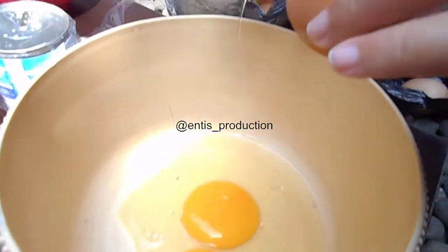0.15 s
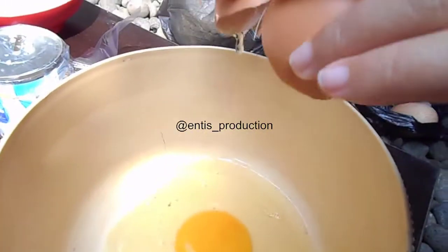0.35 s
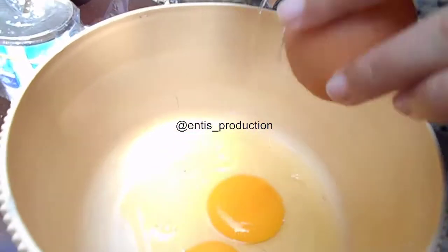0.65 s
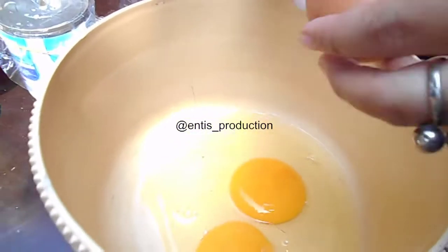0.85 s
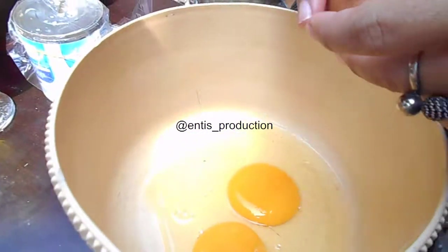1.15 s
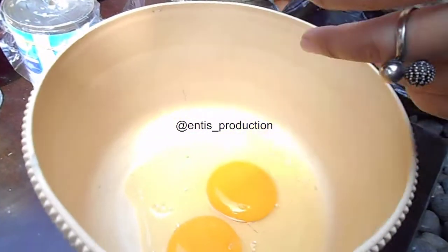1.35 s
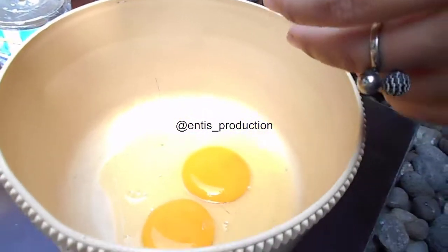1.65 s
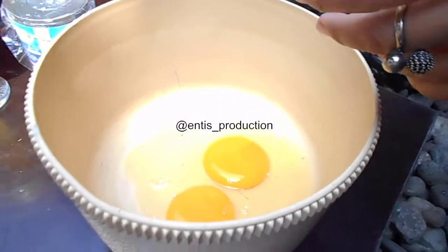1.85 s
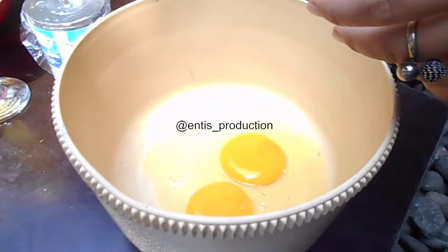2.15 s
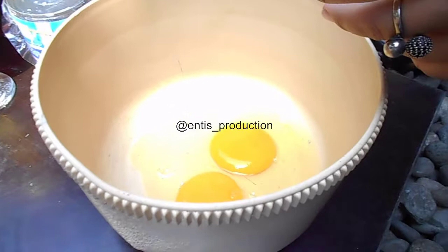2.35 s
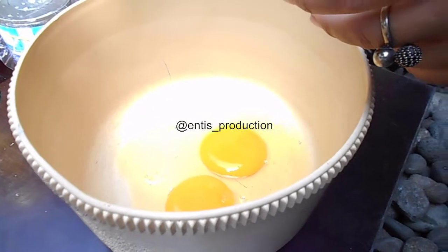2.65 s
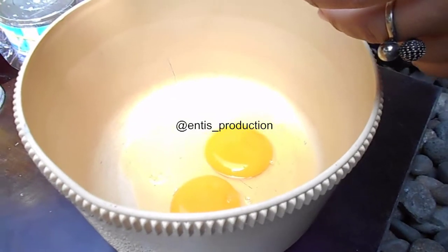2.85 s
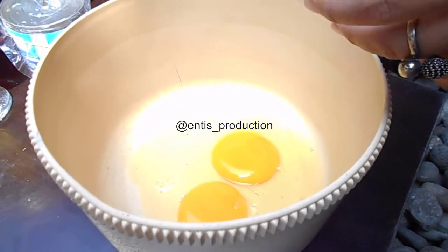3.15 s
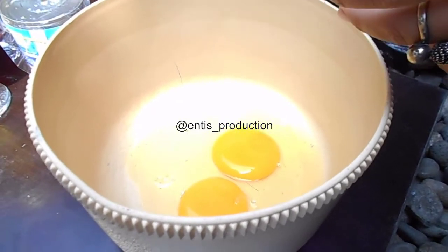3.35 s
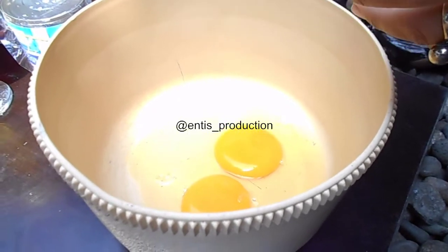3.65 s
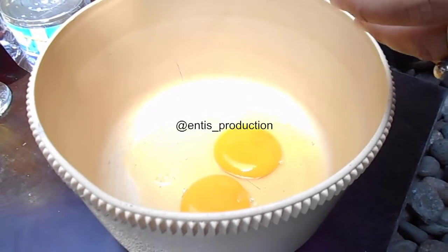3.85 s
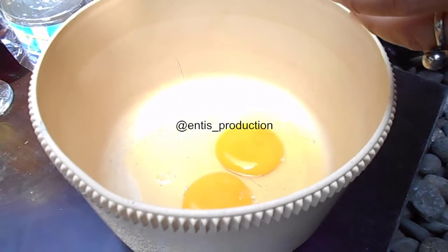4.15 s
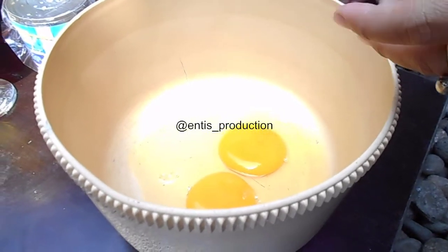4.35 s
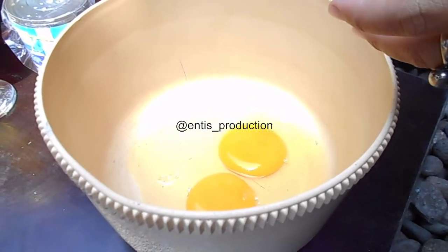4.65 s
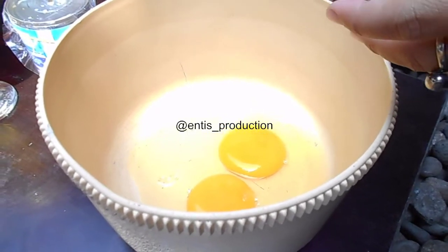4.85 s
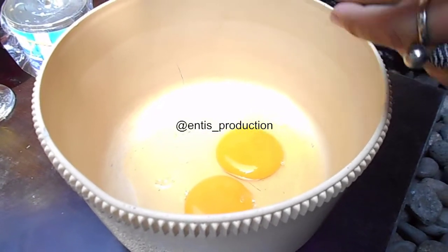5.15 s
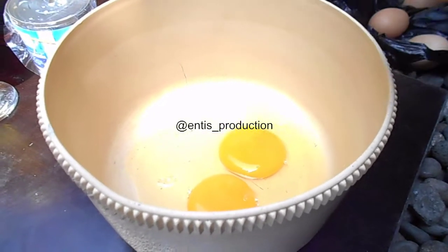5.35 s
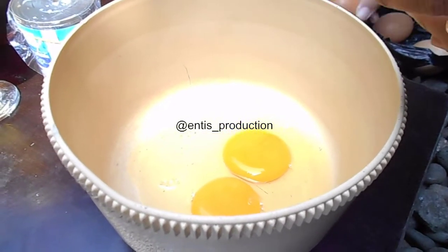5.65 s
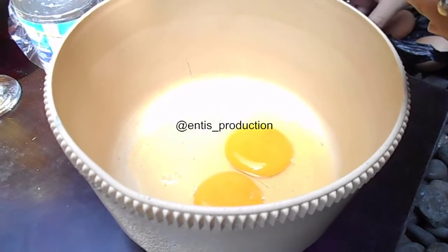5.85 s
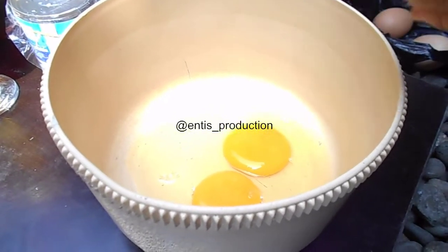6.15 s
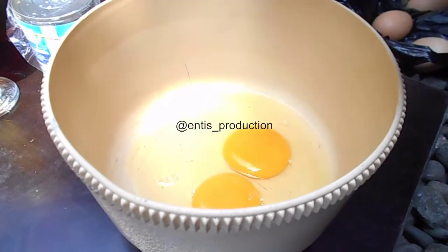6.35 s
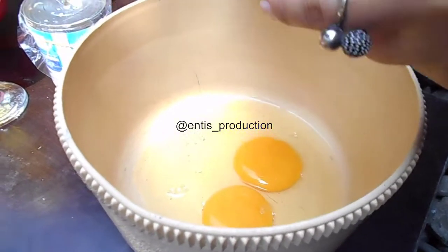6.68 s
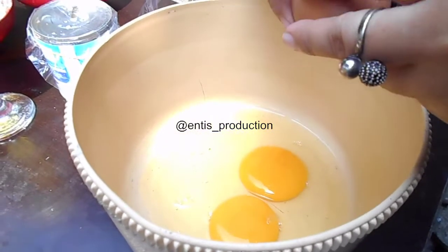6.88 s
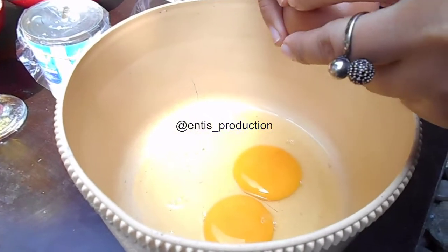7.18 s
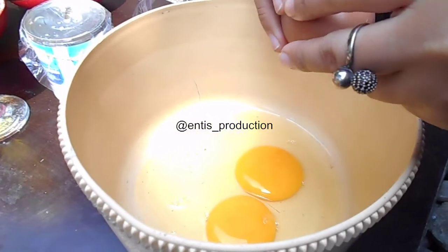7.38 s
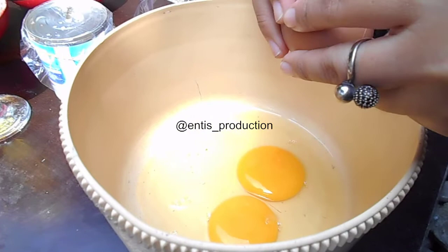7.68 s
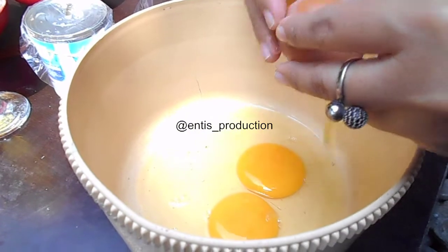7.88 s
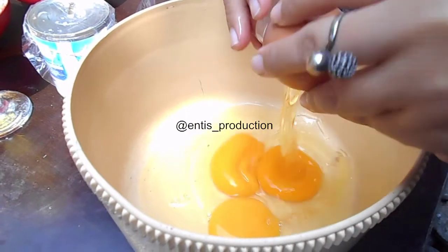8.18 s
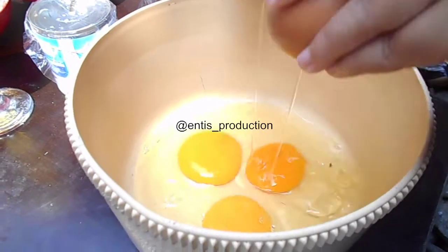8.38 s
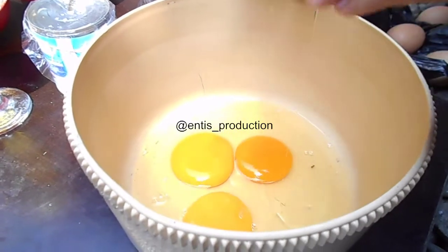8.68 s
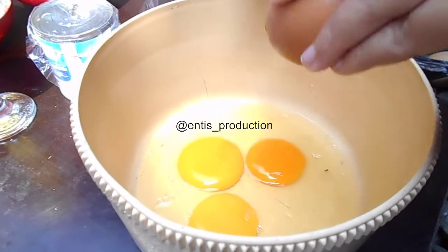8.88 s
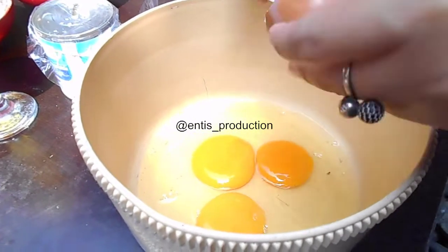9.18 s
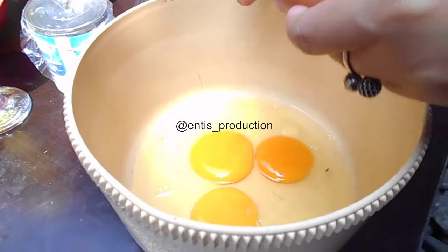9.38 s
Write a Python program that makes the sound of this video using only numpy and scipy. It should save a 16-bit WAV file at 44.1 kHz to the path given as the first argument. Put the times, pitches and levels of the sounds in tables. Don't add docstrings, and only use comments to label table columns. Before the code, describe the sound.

Steady soft hiss with a faint wandering traffic rumble, outdoors-like with a short diffuse tail; the hands are very close. Around 0.06 and 0.3 s empty eggshells snap brightly, again at 0.9, then halves rattle lightly to about 1.2 s, while thin bird whistles chirp far off. From 1.3, and strongest from 1.6 to 4.2 s, a thin bag crackles in uneven grips, tugs and pops, with sharp eggy clicks near 2.4 and 2.5. Hollow tub knocks with cracks land at 4.36, 4.6 and 4.8, a lighter one at 5.8, among dry ticks. A faint high insect trills in spells. Birds return around 6.7 to 7.4. At 7.7 a dense, overloaded crunch caves the shell in; small splits and a pop follow at 8.1 to 8.25. Mostly hiss and traffic drone remain until shell snaps at 9.0 and 9.3 and a hard crackling cluster at 9.45.

```python
import sys
import numpy as np
from scipy import signal
from scipy.io import wavfile

SR = 44100
rng = np.random.default_rng(int(sys.argv[2]) if len(sys.argv) > 2 else 0)


def wrap_up_sound(samples):
    columns = np.atleast_2d(samples).T
    tamed = np.clip(columns, -1, 1)
    steps = np.round(tamed * 32767).astype(np.int16)
    wavfile.write(sys.argv[1], SR, steps)


def magnitude_from_level(level_db):
    exponent = np.asarray(level_db, float) / 20
    return 10 ** exponent


N = 419743
T = np.arange(N) / SR


def rms_one(x):
    return x / np.sqrt(np.mean(x ** 2) + 1e-20)


def peak_one(x):
    return x / np.max(np.abs(x))


def add(out, s, piece):
    i = round(s * SR)
    out[i:i + len(piece)] += piece[:N - i]


def fading(t60, size):
    return magnitude_from_level(-60 * np.arange(size) / SR / t60)


def passed(x, hz, kind, order=2):
    return signal.sosfilt(signal.butter(order, hz, kind, fs=SR, output="sos"), x)


def resonance(x, hz, width_hz):
    r = np.exp(-np.pi * width_hz / SR)
    return signal.lfilter([1 - r * r, 0, r * r - 1], [1, -2 * r * np.cos(2 * np.pi * hz / SR), r * r], x)


def drift(rate_hz, spread_db):
    step = 100
    r = np.exp(-2 * np.pi * rate_hz * step / SR)
    coarse = rng.standard_normal(N // step + 1002)
    slow = signal.lfilter([1], [1, -2 * r, r * r], coarse)[1000:]
    return np.interp(np.arange(N) / step, np.arange(len(slow)), magnitude_from_level(spread_db * rms_one(slow)))


def coloured(source, spectrum, patchy_db, patch_hz, first):
    out = 0
    edges = 25 * 2 ** np.arange(0, 9, .4)[first:]
    hz, level_db = np.transpose(spectrum)
    for k, (low, high) in enumerate(zip(edges, edges[1:])):
        band_db = np.interp(np.log(low * high) / 2, np.log(hz), level_db)
        sign = (-1) ** k
        out = out + sign * magnitude_from_level(band_db) * drift(patch_hz, patchy_db) * passed(source, [low, high], "band")
    return rms_one(out)


def grains(per_s, spread_db, size):
    strengths = magnitude_from_level(spread_db * np.minimum(rng.exponential(1, size), 4))
    return strengths * rng.choice([-1, 1], size) * (rng.random(size) < per_s / SR)


def held(start, end, rise_db, fall_db):
    return -rise_db * np.maximum(start - T, 0) - fall_db * np.maximum(T - end, 0)


def walls(x, t60):
    echo = passed(rng.standard_normal(14000), 580, "high") * fading(t60, 14000)
    return signal.fftconvolve(x, echo / np.sqrt(np.sum(echo ** 2)))[:N]


def air():
    # frequency in Hz, level in dB per Hz.
    air_spectrum = [(15, -43), (25, -6.5), (133, -3.5), (171, -5.5), (204, -7.5), (346, -8), (797, -12),
                    (905, -12), (1840, -15), (5440, -19), (6020, -22), (9020, -21.5), (10500, -17.5),
                    (13600, -55), (22000, -120)]
    # time in seconds, level in dB.
    breeze = [(0, -46.5), (4.3, -46.5), (5.6, -49), (7.2, -47), (7.9, -51), (9.52, -47.5)]
    breeze_db = np.interp(T, *np.transpose(breeze))
    rumble_db = -46.5 + 2.5 * np.exp(-(T - 7.7) ** 2)
    noise = coloured(rng.standard_normal(N), air_spectrum, 1.92, 6.3, first=0)
    hiss = rms_one(passed(noise, 420, "high", order=4))
    rumble = rms_one(passed(noise, 311, "low", order=4))
    return magnitude_from_level(breeze_db + 5.5) * hiss + magnitude_from_level(rumble_db) * rumble


def birds():
    # start in seconds, length in seconds, pitch in Hz, blur width in Hz, level in dB.
    squeaks = [(.0, 0.08, 4430, 400, -43), (0.975, 0.25, 4830, 500, -39), (1.3, 0.091, 4900, 400, -41),
               (6.699, 0.15, 4820, 700, -42), (6.916, .087, 5300, 500, -48),
               (7.204, 0.098, 4600, 350, -38.5), (7.205, 0.18, 6800, 450, -46),
               (7.391, 0.15, 6030, 695, -44), (6.758, 0.18, 2400, 600, -48), (7.058, 0.13, 4400, 500, -48),
               (7.19, 0.09, 5600, 250, -47), (8.475, 0.11, 5550, 400, -47), (8.501, .03, 3700, 300, -45),
               (4.05, .14, 3760, 500, -34.5), (7.296, .14, 4460, 500, -52)]
    # start in seconds, length in seconds, first Hz, last Hz, level in dB.
    whistles = [(0.111, 0.17, 3050, 3020, -44), (0.152, 0.075, 4700, 4750, -38),
                (.153, 0.12, 6800, 6900, -41.5), (0.19, 0.11, 3850, 3780, -38),
                (0.331, 0.15, 4300, 4170, -44), (.86, 0.038, 4260, 4450, -45),
                (0.898, 0.048, 4440, 4450, -30), (0.952, 0.048, 4470, 4200, -35),
                (0.933, 0.091, 3600, 3600, -37.5), (0.997, 0.046, 4160, 4120, -34),
                (1.02, 0.073, 3600, 3600, -37), (1.042, 0.064, 4060, 4250, -37),
                (1.09, 0.037, 4070, 3900, -38), (1.103, 0.12, 3540, 3580, -36.5),
                (1.41, 0.069, 4250, 4350, -40), (1.47, 0.15, 4400, 4350, -50),
                (.915, 0.031, 6500, 6440, -38), (1.54, .07, 8250, 8300, -51), (3.16, 0.16, 4260, 4200, -41),
                (4.199, 0.14, 3720, 3800, -36.5), (4.243, 0.085, 4730, 4760, -37),
                (6.7, 0.079, 3900, 3880, -51), (6.7, 0.11, 6150, 6100, -50),
                (6.801, 0.15, 3750, 3840, -39.5), (7.043, 0.09, 4130, 4420, -46),
                (7.108, 0.098, 4000, 4090, -41), (7.142, 0.076, 4250, 4250, -36.5),
                (7.241, .14, 4370, 4500, -43.5), (7.22, 0.23, 6640, 6450, -47)]
    rise_hz, sag_hz_per_s = 250, 2700
    blur_hz, steadiness = 210, .55
    far = [(s, length, hz, rise_hz - sag_hz_per_s * length, db, width_hz, 0)
           for s, length, hz, width_hz, db in squeaks]
    near = [(s, length, (first + last) / 2, last - first, db, blur_hz, steadiness)
            for s, length, first, last, db in whistles]
    out = np.zeros(N)
    for s, length, hz, glide_hz, db, width_hz, steady in far + near:
        size = round(length * SR)
        phase = 2 * np.pi * np.cumsum(hz + glide_hz * np.linspace(-.5, .5, size)) / SR
        blur = rms_one(passed(rng.standard_normal((2, 12000)), width_hz / 2, "low"))[:, -size:]
        note = (steady + blur[0]) * np.cos(phase) + blur[1] * np.sin(phase)
        swell = np.sin(np.pi * np.linspace(0, 1, size) ** 0.57)
        add(out, s, magnitude_from_level(db) * rms_one(note) * swell)
    return out


def engines():
    # start in seconds, length in seconds, first Hz, last Hz, level in dB.
    drones = [(0, 1.34, 97, 91.2, -50), (1.15, 0.69, 133, 136.7, -48.5), (.8, 0.6, 152, 154, -58),
              (5.9, 0.98, 125, 129.5, -52), (6, 1.5, 147, 148.6, -53), (6.7, 3.7, 84, 88.5, -55),
              (7.6, 1, 42, 45, -61), (7.6, 0.82, 188, 192.4, -46.5), (7.8, 1.28, 133, 127.2, -53),
              (8.65, 0.3, 200, 202, -48), (8.95, 0.34, 156, 156, -45), (8.2, 1.3, 170, 160, -56)]
    out = np.zeros(N)
    for s, length, first_hz, last_hz, db in drones:
        size = round(length * SR)
        turns = np.cumsum(np.linspace(first_hz, last_hz, size) * drift(2.5, .08)[:size]) / SR
        swell = np.sin(np.pi * np.linspace(0, 1, size)) ** .6
        add(out, s, magnitude_from_level(db) * drift(4, 2.5)[:size] * np.sin(2 * np.pi * turns) * swell)
    return out


def fracture(bright_db, ring_db, hz, t60, squeezed=False):
    # ratio to its pitch, level in dB.
    piece_modes = [(0.985, 6), (1.346, -5.5), (1.618, -7), (0.82, -1.5)]
    size = 2200
    rise_s = 0.0018 if squeezed else 0.0012
    rise = np.minimum(np.arange(size) / (rise_s * SR), 1)
    spray = (rng.standard_normal(size) + .5 * grains(4000, 6.7, size)) * rise * fading(t60, size)
    centre_hz, width_hz, spread = (9800, 2700, .06) if squeezed else (7860, 3700, .26)
    own_hz = centre_hz * (1 + spread * rng.uniform(-1.35, 1))
    bright = passed(resonance(spray, own_hz, width_hz), 4500, "high")
    bent = resonance(spray * fading(11 * t60, size), 1.11 * hz, 0.51 * hz)
    ring = sum(magnitude_from_level(db) * resonance(bent, hz * ratio, 0.085 * hz) for ratio, db in piece_modes)
    thump = resonance(spray, 260, 720)
    thump_db = 3.2 * bright_db - 35.4
    return magnitude_from_level(bright_db) * peak_one(bright) + magnitude_from_level(ring_db - 4) * peak_one(ring) + magnitude_from_level(thump_db) * peak_one(thump)


def snaps():
    # start in seconds, bright peak in dB, ring in dB, ring in Hz.
    squeezes = [(.056, -24, -12, 7300), (.0586, -23, -14.5, 2040), (.0605, -16, -13, 5430),
                (.063, -19, -4.5, 7430), (.0655, -9.5, -14.5, 3300), (.068, -25, -18, 5300),
                (.071, -30, -23, 2400), (.1858, -13.5, -21, 1740), (.3165, -11, -7, 5300),
                (.32, 1.5, -19, 5140), (.3225, -11, -8, 5100), (.314, -10, -20, 1770),
                (.351, -14, -18, 4900), (.362, -22, -23, 2770), (.366, -11, -20, 6500),
                (.371, -15, -16, 5300), (.376, -27, -28, 5330), (.3294, -5, -15, 2600),
                (.3373, 0.5, -16, 2230), (.3461, -0.5, -13, 3630), (.3563, -12, -20, 2780),
                (.8898, -1.5, -39, 6900), (.892, -20, -13, 7300), (.9489, -24, -23, 3640),
                (1.4076, -37, -19.5, 3200), (9.013, -30, -24, 2210), (9.0388, -3.5, -25, 5300),
                (9.3222, -17, -7.5, 1990), (9.337, -38, -20, 2120), (9.3525, -33, -17, 3200),
                (9.353, -40, -15, 2090), (9.3675, -38, -19, 3400), (9.4355, -20, -18, 6000),
                (.884, -40, -26.5, 2210), (9.4522, 5, -13, 2600), (9.457, -5, -7, 6000),
                (9.461, -2, -2, 2010), (9.4645, -9, -6, 2900), (9.468, -18, -22, 4300),
                (9.473, -32, -9, 2900), (9.485, -38, -23, 2900), (9.493, -32, -20, 2500),
                (9.502, -32, -28, 3000)]
    # start in seconds, bright peak in dB, ring in dB.
    drops = [(.961, -12.5, -10), (0.993, -17, -5.5), (.999, -6.5, -11), (1.002, -8.5, -16),
             (1.006, -12, -20), (1.0733, -16.5, -9.5), (1.0985, -31, -19), (1.126, -13, -11),
             (1.134, -17, -13), (1.142, -37, -22), (1.17, -23, -11.5), (9.435, -16, -13.5),
             (9.442, -34, -29), (9.453, -18, -15), (9.456, -14, -3.5), (9.4617, -1.5, -4.5),
             (9.467, -7, -6), (9.478, -31, -9)]
    # start in seconds, bright peak in dB, ring in dB, Hz.
    creases = [(1.6945, -13, -31, 4350), (2.3264, -22, -28, 5200), (2.3861, -0.5, -9.5, 1820),
               (2.388, -12, -9, 8100), (2.565, -30, -16.5, 1950), (2.92, -30, -13.5, 2900),
               (2.959, -30, -17, 2900), (2.98, -32, -18, 2900), (2.922, -20, -5, 8900),
               (2.387, -17, -11, 6400), (2.45, -11, -7, 6000), (2.476, -7, -15, 1860),
               (2.477, -25, -10, 5770), (2.5256, 6, -9, 1950), (2.5257, -19, -4, 5530),
               (2.6086, -28, -16, 2590), (2.8419, -17, -14.5, 1970), (2.9178, -16, -10.5, 1860),
               (2.9585, -11.5, -12, 1860), (3.02, -14, -18.5, 1930), (3.5646, -28, -29, 4480),
               (3.7062, -23, -12.5, 920), (3.7308, -23, -10, 910), (3.732, -30, -22, 520),
               (3.706, -30, -21, 620), (3.808, -27, -20, 1240), (4.193, -30, -32, 910),
               (3.765, -33, -21, 2100), (6.8294, -36, -32, 3820)]
    # start in seconds, bright peak in dB, ring in dB, ring in Hz.
    crunch = [(7.7099, 8.5, -11, 3670), (7.7145, -10, -15, 3520), (7.724, 9, 0.5, 3410),
              (7.7262, 2.5, 4, 3570), (7.7458, 7.5, 5.5, 3320), (7.748, -4, -7, 3440),
              (7.7075, -14, -30, 3500), (7.7205, -18, -3, 3570), (7.7745, 4.5, -8, 2900),
              (7.7595, 7, 2, 2900), (7.7615, 2, 7, 2980), (7.765, 9.5, 8, 3430), (7.768, 3, 12, 3000),
              (7.7716, 8, 6, 2860), (7.779, -19, -15, 3000)]
    # start in seconds, bright peak in dB, ring in dB, ring in Hz.
    cracks = [(4.388, -33, -10, 2780), (4.4665, -22.5, -70, 704), (4.615, -14, -16, 3320),
              (4.8192, -9, -6, 2970), (4.849, -20, -15, 1720), (5.8055, -24, -27, 4550),
              (5.8095, 2, -15, 3200), (5.8185, -5, -8, 3040), (5.866, -13, -13, 4470),
              (5.8662, -14, -16, 2900), (7.8502, -24, -15, 2190), (7.8682, -33, -16.5, 2190),
              (7.9807, -30, -25.5, 1970), (8.1435, -0.5, 0.5, 4490), (8.1437, -29, -7, 2320),
              (8.213, -26, -22, 4000), (8.2144, -10, -7.5, 5030), (8.216, -7, -10, 7000),
              (8.2252, -4.5, -0.5, 5010), (8.227, -18, 5, 1970), (8.2345, -24, -5, 1970),
              (8.243, -40, -23, 3450), (8.298, -31, -40, 4000), (8.315, -32, -23.5, 4000),
              (8.3825, -40, -18, 2500), (8.097, -30, -45, 5500), (8.525, -40, -30, 4000)]
    # start in seconds, peak in dB.
    ticks = [(0.054, -14), (0.1924, -11.5), (0.2441, -24), (0.506, -24), (0.811, -25), (2.762, -7),
             (4.1157, -12), (4.23, -15), (4.288, -17.5), (4.3273, -11), (4.578, -13), (4.754, -19.5),
             (4.8045, -21), (4.909, -21), (4.944, -22), (5.01, -24), (5.2651, -26.5), (5.292, -27),
             (5.398, -17.5), (5.792, -19), (6.5133, -20), (7.6964, -19), (8.125, -22), (8.3242, -21.5),
             (8.3823, -14), (8.511, -23.5), (8.895, -31), (9.132, -26), (9.1698, -29)]
    flecks = [5.615, 5.713, 7.3465, 7.4255, 7.5015, 7.5885, 8.5243, 8.588, 8.707]
    # frequency in Hz, width in Hz, level in dB.
    shell_modes = [(4600, 270, -9), (5540, 590, -11), (7400, 870, -20.5), (8800, 720, -15.5)]
    scatter = 1 + 0.048 * rng.standard_normal(len(drops))
    pitched_drops = [(*row, 1647 * k) for row, k in zip(drops, scatter)]
    kinds = [(squeezes, 0.02, True), (pitched_drops, 0.015, False), (creases, 0.025, False),
             (crunch, 0.0097, False), (cracks, 0.019, False)]
    out = np.zeros(N)
    for rows, t60, squeezed in kinds:
        for s, bright_db, ring_db, hz in rows:
            add(out, s - .0005, fracture(bright_db, ring_db, hz, t60, squeezed))
    for s, db in [*ticks, *((s, -32) for s in flecks)]:
        add(out, s - .0009, fracture(db - 2, db - 15, 2460, 0.02))
    return out + sum(magnitude_from_level(db) * resonance(out, hz, width_hz) for hz, width_hz, db in shell_modes)


def insect():
    # start in seconds, end in seconds, level at the end in dB.
    spells = [
        (.2, .9, -50.5),
        (4.4, 4.94, -46),
        (5.3, 6.46, -49.5),
        (6.95, 7.716, -49),
        (8.2, 9.197, -49.5),
    ]
    hz, width_hz, strokes_per_s = 9050, 450, 81
    swell_db, edge_db = 9, 150
    turns = np.cumsum(strokes_per_s * drift(1.9, 0.06)) / SR
    strokes = (.5 + .5 * np.sin(2 * np.pi * turns)) ** 1.8
    band = resonance(resonance(rng.standard_normal(N), hz, width_hz), hz, width_hz)
    song = rms_one(band * (0.56 + strokes))
    return song * sum(magnitude_from_level(db + held(end, end, swell_db, 0) + held(start, end, edge_db, edge_db))
                      for start, end, db in spells)


def pressure(touches, tighten_db):
    loosen_db = 183
    return np.sqrt(sum(magnitude_from_level(2 * (db + held(s, s + hold, tighten_db, loosen_db))) for s, db, hold in touches))


def fumbling():
    # frequency in Hz, level in dB per Hz.
    crinkle = [(2600, -7), (4000, -5.5), (5200, -4.5), (6500, -3), (8500, 4), (10000, 3)]
    # frequency in Hz, level in dB per Hz.
    rub = [(300, -50), (500, 3.5), (740, -14.5), (930, -1.5), (1360, -8.5), (1870, -1), (3200, -7.5),
           (4500, -4), (6500, -1)]
    # frequency in Hz, width in Hz, level in dB.
    film_bands = [(980, 260, -5.5), (1860, 190, -9), (2240, 210, -6), (2810, 160, 0), (3450, 180, -19),
                  (4250, 220, 3), (4900, 300, 0), (5940, 140, -14), (3600, 170, 2)]
    # start in seconds, crinkle in dB, hold in seconds.
    grip_rows = [(1.3, -38.5, 0.16), (1.68, -24, 0.19), (1.97, -32, 0.043), (2.04, -28, 0.16),
                 (2.28, -26.5, 0.24), (2.53, -20, 0.012), (2.585, -25, .02), (2.63, -26, 0.046),
                 (2.74, -24, 0.034), (2.9, -27.5, 0.036), (3.22, -23.5, 0.11), (3.345, -21, 0.0058),
                 (3.43, -22, 0.043), (3.53, -21, 0.056), (3.63, -23, 0.17), (3.77, -17, 0.017),
                 (3.91, -21.5, 0.068), (3.96, -24, 0.065), (4.11, -27.5, 0.084), (4.33, -30, 0.0091),
                 (6.27, -48, 0.096)]
    # start in seconds, crinkle in dB, hold in seconds.
    snatches = [
        (1.635, -29.5, 0.029),
        (2.195, -24.5, 0.026),
        (2.845, -27.5, 0.014),
        (3.122, -17.5, 0.026),
    ]
    # start in seconds, rub in dB, hold in seconds.
    slide_rows = [
        (.95, -40.5, 0.3),
        (2.99, -36, 0.15),
        (6.71, -40, 0.13),
        (6.87, -45, 0.099),
    ]
    tighten_db, snatch_db = 232, 1500
    clumps = drift(60, 2.4)
    patter = rms_one(grains(3000 * clumps, 2.7, N))
    lone_clicks = rms_one(grains(160 * clumps, 0.93, N))
    crackle = patter + 0.12 * lone_clicks
    film = coloured(crackle + 0.6 * rng.standard_normal(N), crinkle, 1.65, 9.1, first=16) * clumps ** 0.24
    skin = coloured(0.38 * crackle + rng.standard_normal(N), rub, 0.35, 40, first=9) * clumps ** 0.74
    skin = skin + sum(magnitude_from_level(db) * resonance(skin, hz, width_hz) for hz, width_hz, db in film_bands)
    grips = np.hypot(pressure(grip_rows, tighten_db), pressure(snatches, snatch_db))
    slides = pressure(slide_rows, tighten_db)
    return (grips + magnitude_from_level(-4) * slides) * rms_one(film) + (slides + magnitude_from_level(-7) * grips) * rms_one(skin)


def pops():
    # start in seconds, peak in dB.
    film_pops = [(1.6364, -26), (1.6496, -17), (1.7544, -9), (1.9515, -17), (1.972, -17), (2.0343, -9.5),
                 (2.3506, -11), (2.371, -6), (2.6858, -14), (2.7312, -10), (3.2725, -10), (3.4251, -9),
                 (3.5872, -19), (3.6326, -23), (3.6531, -26), (3.7314, -8), (3.8596, -10), (3.8871, -12),
                 (3.9624, -6.5), (4.152, -15), (4.1884, -10)]
    out = np.zeros(N)
    for s, db in film_pops:
        add(out, s - .0009, fracture(db - 1, db - 21, 2800, 0.015))
    return out


def knocks():
    # start in seconds, blow in dB, crack in dB, contact in seconds, tail in dB.
    blows = [
        (4.3615, 12.5, 5, 0.00091, -10),
        (4.589, 10, 13, 0.001, -10),
        (4.82, 5.5, 5, 0.0015, -20.5),
        (5.8052, -1.5, 3.5, 0.0015, -21.5),
        (8.2254, 6.5, -9, .001, -47),
        (7.7143, -7, -40, .001, -60),
    ]
    # frequency in Hz, level in dB, t60 in seconds.
    tub = [
        [(260.4, -10, 0.13), (143, -15.5, 0.13), (462, -4.5, 0.11), (395, -2.5, .07), (587.4, 2.5, 0.11),
         (683, -25, 0.55), (641, -9, 0.18), (746, -3, 0.067), (1022, -8, 0.042), (308, -13, 0.11),
         (847, -0.5, 0.062), (1353, 2.5, 0.031), (1784, -3, 0.043), (2034, -13, 0.062), (1970, -4, 0.04)],
        [(250, -9, 0.083), (581.5, 1, 0.067), (797, -6.5, 0.11), (848, 1, 0.026), (432, -20, 0.1),
         (1010, -7.5, 0.079), (1248, -27, 0.29), (1304, -19, 0.18), (1427, -14.5, 0.13), (1588, -3, 0.043),
         (144.3, -23, 0.14), (1723, -20, 0.14)],
        [(142, -19, 0.12), (448, -16.5, 0.09), (570, -1, 0.032), (786, -15.5, 0.058), (1010, -4.5, 0.035),
         (1670, -1, 0.022), (1970, -16, 0.033), (2900, -7, 0.015)],
        [(264, -3, .1), (572, 7, 0.064), (805, 0.5, 0.037), (990, -15, 0.062), (1380, -5, 0.033),
         (1610, 4, 0.032), (3040, -22, 0.041)],
        [(1780, -16, 0.067), (1970, 3, 0.03), (2400, 2.5, 0.022), (2500, -26, 0.21), (2520, -26, 0.13),
         (2010, -30, 0.19), (2900, -20, 0.076), (3430, -27, 0.086)],
        [(3520, 0, 0.05), (3400, -8, .05)],
    ]
    # band centre in Hz, level in dB, t60 in seconds.
    tub_tail = [(196, -6.5, 0.16), (400, -6, 0.28), (790, -0.5, 0.27), (1440, 5, 0.1), (3200, -7, 0.16),
                (6400, -16.5, 0.24)]
    out, size = np.zeros(N), 14000
    t = np.arange(size) / SR
    for (s, blow_db, crack_db, contact_s, tail_db), modes in zip(blows, tub):
        noise = rng.standard_normal((3, size))
        body = np.zeros(size)
        for hz, db, t60 in modes:
            buildup = 1 - np.exp(-t * hz / 1.77)
            tone = np.sin(2 * np.pi * hz * t + rng.uniform(0, 2 * np.pi))
            wander = rms_one(passed(rng.standard_normal(size), 34, "low"))
            flutter = magnitude_from_level(2.2 * np.tanh(t / 0.044) * wander)
            body += magnitude_from_level(db) * fading(t60, size) * buildup * tone * flutter
        crack = peak_one(passed(noise[0], 960, "high") * fading(0.025, size))
        tail = np.zeros(size)
        for k, (hz, db, t60) in enumerate(tub_tail):
            band = passed(noise[1 + k % 2], [hz / 1.27, hz * 1.41], "band")
            tail += magnitude_from_level(db) * rms_one(band) * fading(t60, size)
        swell = 1 - np.exp(-t / contact_s)
        add(out, s, magnitude_from_level(blow_db) * peak_one(body) + magnitude_from_level(crack_db) * crack + magnitude_from_level(tail_db) * tail * swell)
    return out


def scene():
    shell, song = snaps(), birds()
    near = shell + magnitude_from_level(-17.5) * walls(shell, 0.14) + knocks() + fumbling() + pops()
    far = song + magnitude_from_level(-6) * walls(song, .45) + insect() + air() + engines()
    return (near + far)[None]


def roll_off(x):
    return signal.sosfilt(signal.butter(12, 16620, fs=SR, output="sos"), x)


def record(dry):
    edge_hz, mirror_db, top_hz, overload = 10510, -2, 15660, 3.5
    x = passed(dry, edge_hz, "low", order=22)
    x = x * (1 + magnitude_from_level(mirror_db) * (-1.) ** np.arange(N))
    x = np.clip(x, -overload, overload)
    x = signal.sosfilt(signal.cheby2(14, 60, top_hz + 300, fs=SR, output="sos"), x)
    return roll_off(np.clip(x, -.97, .97))


dry = scene()
out = record(dry)
wrap_up_sound(out)
```